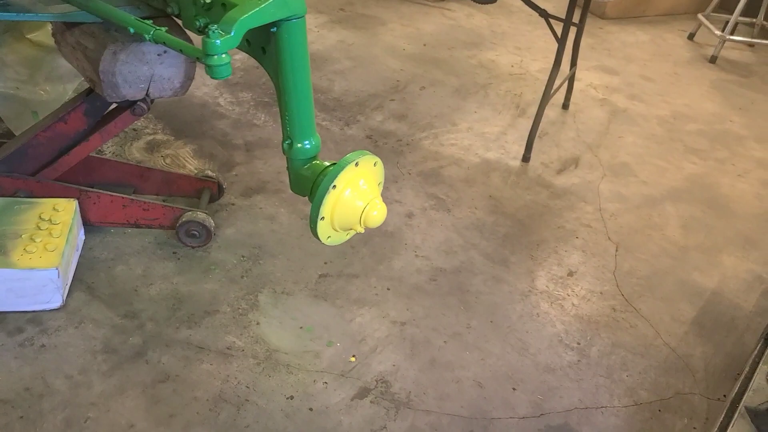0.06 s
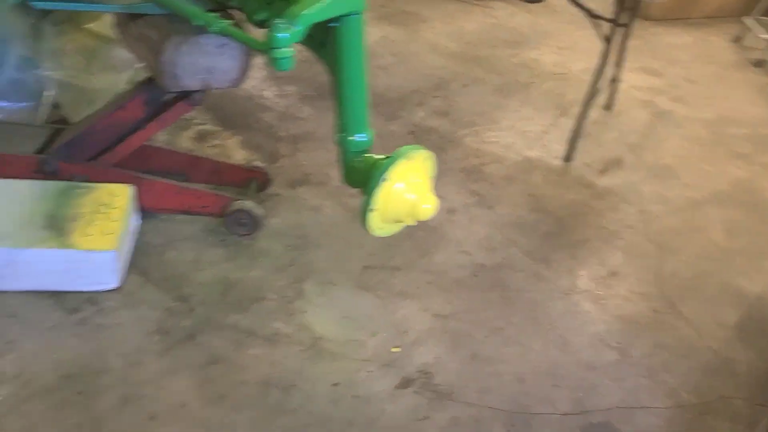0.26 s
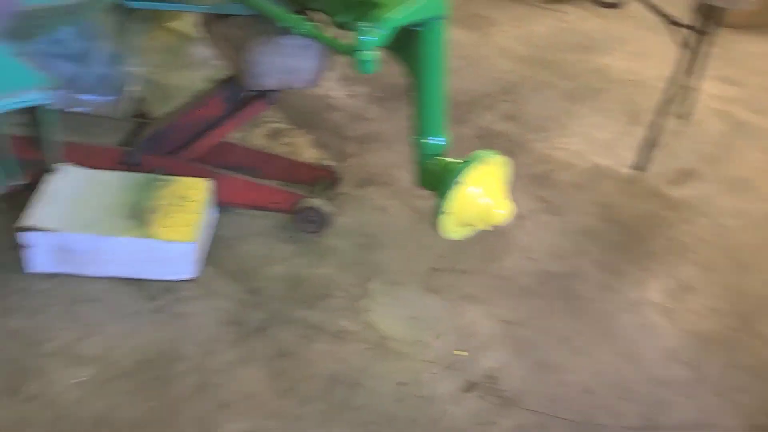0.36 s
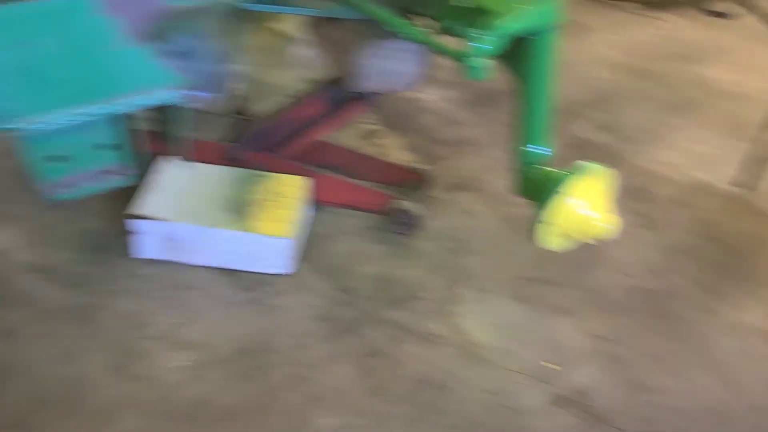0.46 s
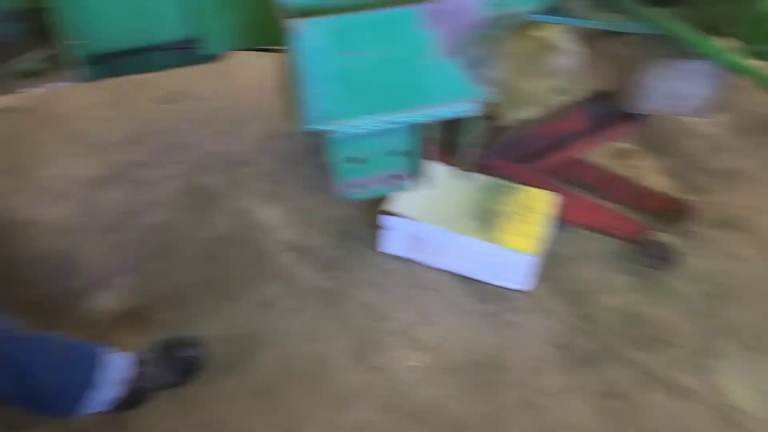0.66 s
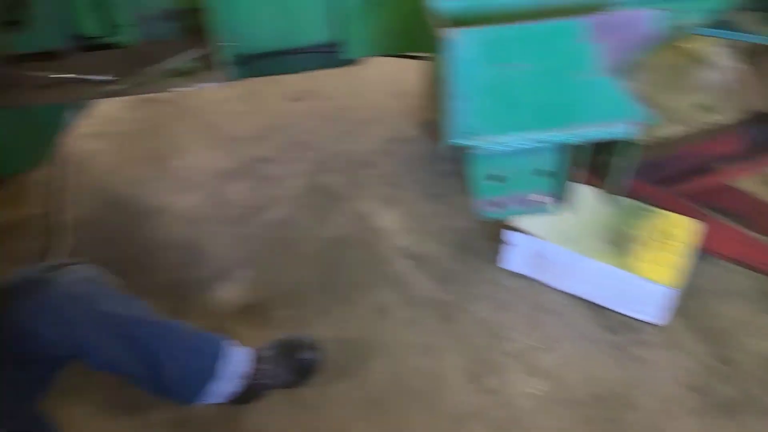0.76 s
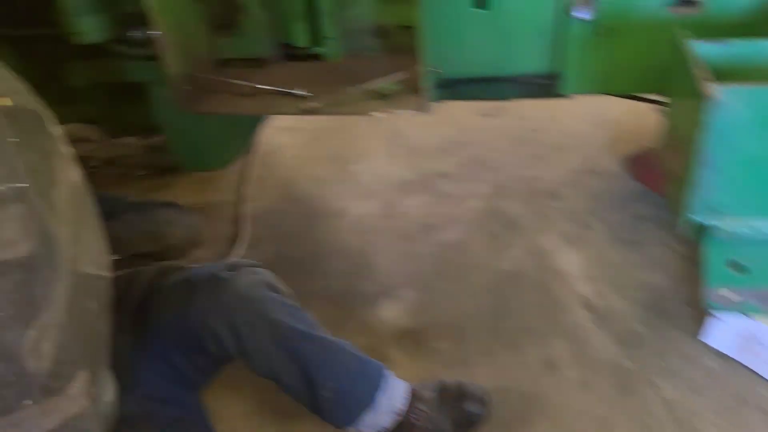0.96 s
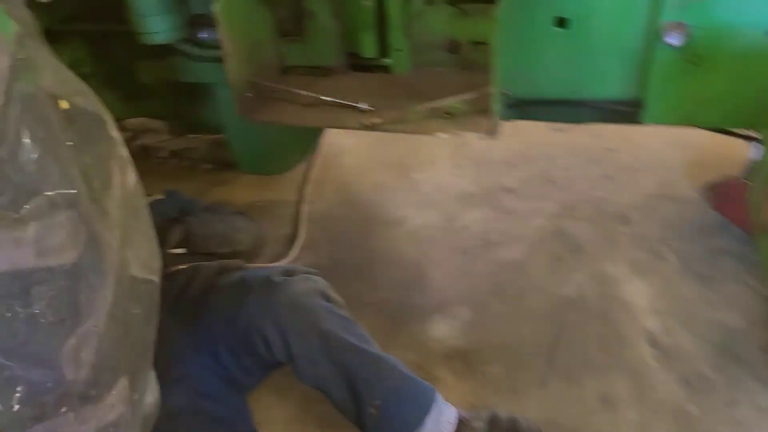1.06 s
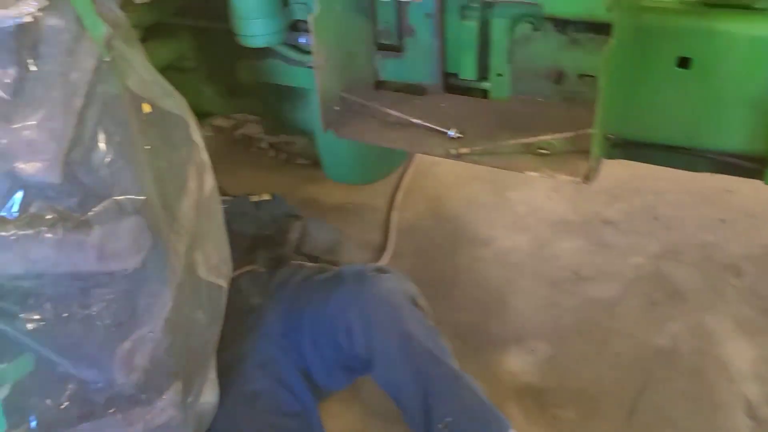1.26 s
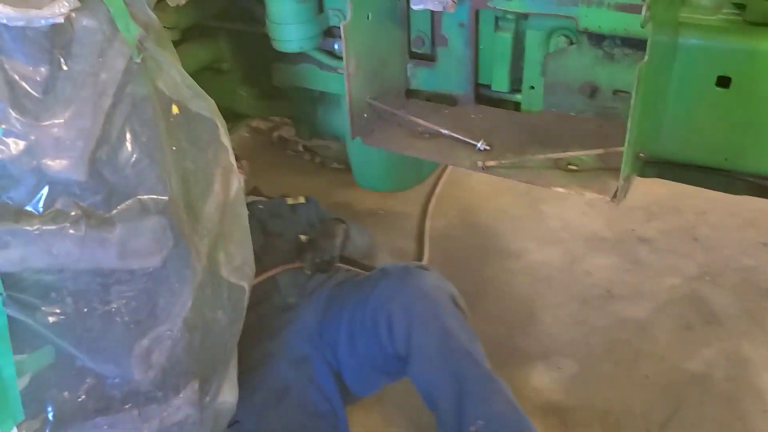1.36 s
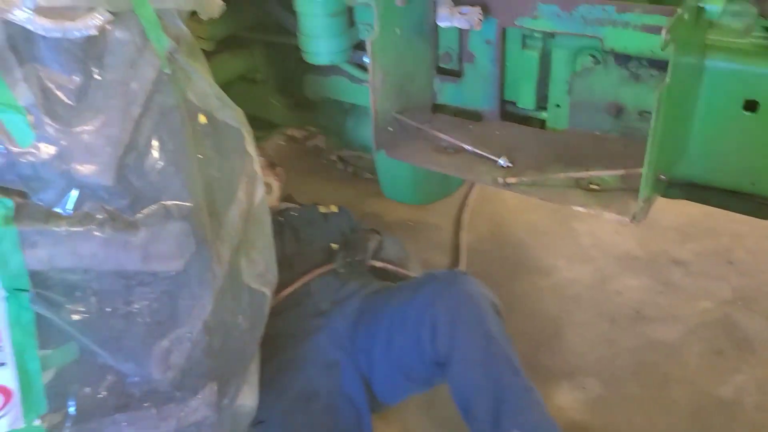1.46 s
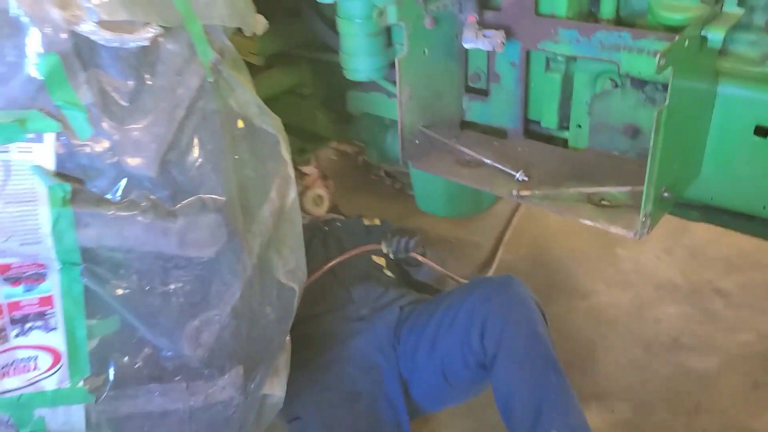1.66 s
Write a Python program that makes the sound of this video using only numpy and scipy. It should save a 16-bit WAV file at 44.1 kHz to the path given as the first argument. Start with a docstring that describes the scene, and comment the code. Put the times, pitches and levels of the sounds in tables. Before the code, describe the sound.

A paint spray gun fires one loud, short burst of compressed air over a steady faint leak hiss; its tail fades in a hard workshop, then a hollow object knocks several times, heard by a close stereo microphone.

```python
"""A spray-gun burst in a farm workshop. Throughout: filtered-noise leak hiss and low shop noise; steel sines fade.
At 0.19 s the trigger opens the air, a surging noise jet; then paint dulls and thickens it.
On release the paint stops first. Steel parts sing faintly in the blast; the room leaves a tail.
Soft thuds, bursts of low noise, start with the puff of the valve and run on past the gun.
Last, a faint drag, then a hollow object knocks: noise clatter rings its modes."""
import sys
import numpy as np
from scipy import signal
from scipy.fft import rfft, irfft
from scipy.io import wavfile
from scipy.ndimage import uniform_filter1d

SR = 44100
rng = np.random.default_rng(int(sys.argv[2]) if len(sys.argv) > 2 else 0)


def inscribe(sig):
    """Save sig as 16-bit PCM at rate SR to the path in sys.argv[1].

    A 1-D sig is mono; a 2-D sig holds one channel per row.
    Samples are clipped to [-1, 1] before scaling.
    """
    pcm = np.round(np.clip(np.atleast_2d(sig).T, -1, 1) * 32767)
    wavfile.write(sys.argv[1], SR, pcm.astype(np.int16))


N = 74970
T = np.arange(N) / SR
CUTOFF_HZ = 15650


def from_db(db):
    """Decibels to gain."""
    return 10 ** (np.asarray(db) / 20)


def rms_one(x):
    """Scale to unit rms."""
    return x / np.sqrt(np.mean(x ** 2) + 1e-20)


def at_hz(points, hz):
    """Read a table on a log-frequency axis."""
    f, value = np.transpose(points)
    return np.interp(np.log(hz + 1e-3), np.log(f), value)


def pan(db):
    """Left and right gains for a left-minus-right level difference."""
    g = from_db(np.array([[.5], [-.5]]) * db)
    return g / np.sqrt(np.mean(g ** 2, axis=0))


# left-right likeness: f/Hz, correlation
LIKENESS = [(40, 0.78), (140, 1), (350, 0.88), (700, 0.89), (1250, -0.63), (2500, 0.095), (15000, 0.021)]


def stereo(mid, side, hz):
    """Mix two independent noises into channels with the correlation tabled at hz."""
    alike = np.clip(at_hz(LIKENESS, hz), -1, 1)
    return np.sqrt(1 + alike) * mid + np.sqrt(1 - alike) * side * [[1], [-1]]


def noise(spectrum, balance=None, tilt_db_per_octave=0):
    """Coloured stereo noise, alike in the bass, falling away outside its table; rms 1."""
    hz = np.arange(1, N // 2 + 2) * SR / N
    mid, side = rfft(rng.standard_normal((2, N)))
    low_edge = 1 / np.hypot(1, (spectrum[0][0] / 2 / hz) ** 2)
    high_edge = 1 / np.hypot(1, (hz / 2 / spectrum[-1][0]) ** 2)
    colour = from_db(at_hz(spectrum, hz) + tilt_db_per_octave * np.log2(hz))
    gain = (hz < CUTOFF_HZ) * low_edge * high_edge * colour
    sides = pan(at_hz(balance, hz) if balance else 0)
    return rms_one(irfft(stereo(mid, side, hz) * gain * sides, N))


def flutter(rate_hz):
    """Random wander: straight lines between normal draws of spread 1."""
    return np.interp(T * rate_hz, np.arange(1000), rng.standard_normal(1000))


def valve(on_s, off_s, attack_s, release_s):
    """Opens, holds and closes."""
    opening = np.clip((T - on_s) / attack_s, 0, 1)
    closing = np.clip(1 - (T - off_s) / release_s, 0, 1)
    return opening * closing


def blow(start_s, rise_s, decay_s):
    """Linear rise, then exponential decay with time constant decay_s."""
    return np.clip((T - start_s) / rise_s, 0, 1) * np.exp(-np.maximum(T - start_s - rise_s, 0) / decay_s)


MIC_SPREAD_S = 0.00077  # longest delay between the two microphones


def ring(hz, t60_s):
    """A dying sine, its phase shifted by a slightly different arrival at each microphone."""
    arrival_s = T + MIC_SPREAD_S * rng.random((2, 1))
    return from_db(-60 * T / t60_s) * np.sin(2 * np.pi * (hz * arrival_s + rng.random()))


def ringing(x, modes, db):
    """What a sound leaves ringing in a set of modes, at a level relative to that sound."""
    response = sum(from_db(mode_db) / np.sqrt(t60_s) * ring(hz, t60_s) for hz, mode_db, t60_s in modes)
    rung = signal.fftconvolve(x, response, axes=1)[:, :N]
    return from_db(db) * np.std(x) * rms_one(rung)


# leaking air: f/Hz, density/dB per Hz
LEAK_SPECTRUM = [(880, -27), (1500, -10.5), (1700, -16), (2110, -12), (2240, -19), (2540, -9.5),
                 (2700, -13.5), (3180, -9), (3280, -11.5), (3800, -10.5), (4440, -7.5), (5780, -0.5),
                 (8460, -5.5), (11900, -1), (15500, -3.5)]
# leaking air: f/Hz, left minus right/dB
LEAK_BALANCE = [(2000, -14.5), (4000, -3), (6300, -4), (7600, 1), (8700, -2), (10000, -2.5), (11700, -8),
                (13300, -0.5), (15000, -2.5)]
# low noise of the shop: f/Hz, density/dB per Hz
SHOP_SPECTRUM = [(22, -6), (50, -0.5), (90, -1), (180, -16.5), (380, -13.5), (550, -13.5), (750, -7.5),
                 (1200, -11.5), (2000, -19.5), (4000, -13)]
# ring of steel: f/Hz, level/dB
STEEL_MODES = [(947, -54), (968, -49.5), (994, -52), (1016, -53.5), (1036, -50.5), (1114, -48), (1400, -62),
               (1755, -56)]
LEAK_DB, SHOP_DB, STEEL_T60_S = -36, -50, 0.68


def background():
    """Steady noise of leaking air and shop; steel as sines dying from the start."""
    leak = from_db(LEAK_DB) * noise(LEAK_SPECTRUM, LEAK_BALANCE)
    shop = from_db(SHOP_DB) * noise(SHOP_SPECTRUM)
    steel = sum(from_db(db) * ring(hz, STEEL_T60_S) for hz, db in STEEL_MODES)
    return leak + shop + steel


# jet of air alone: f/Hz, density/dB per Hz
AIR_SPECTRUM = [(300, -51), (700, -17), (1100, -23), (1600, -5), (2100, -7), (2900, -1.5), (3800, -1.5),
                (5000, -1), (5900, 2), (7000, -0.5), (8000, -1.5), (10100, -4.5), (11500, 2), (12300, -2),
                (12900, 4), (13500, 2.5), (14500, 4), (15300, 0)]
# jet of air with paint: f/Hz, density/dB per Hz
PAINT_SPECTRUM = [(300, -9), (600, -11.5), (950, -10), (1250, -2.5), (2000, 0.5), (3050, 2.5), (3450, -2),
                  (3800, 0.5), (4400, -3.5), (5500, -0.5), (6600, 2), (8000, -4.5), (10000, -7),
                  (11400, 0.5), (13000, -0.5), (14200, 0), (15100, 1)]
# buffeting of the blast: f/Hz, density/dB per Hz
RUMBLE_SPECTRUM = [(22, -11), (45, -1), (70, 6), (95, 0), (128, 10), (165, -3), (230, -2), (340, 0),
                   (480, -12), (900, -7)]
# both jets: f/Hz, left minus right/dB
JET_BALANCE = [(100, -8), (300, 2), (600, -3.5), (1200, -5), (1700, -8), (3400, -3.5), (5000, -4.5),
               (6300, -5), (7400, 0), (8800, -6.5), (10000, -1), (11700, -6), (13000, 0), (15000, 0)]
AIR_DB, PAINT_DB, RUMBLE_DB = -18, -22, -39.5
AIR_ON_S, AIR_OFF_S, AIR_ATTACK_S, AIR_RELEASE_S = 0.191, 0.55, 0.011, 0.06
PAINT_ON_S, PAINT_OFF_S, PAINT_ATTACK_S, PAINT_RELEASE_S = 0.229, 0.489, 0.048, 0.085
RUMBLE_OFF_S, RUMBLE_RELEASE_S = 0.54, 0.12
# pressure stored in the hose, spent at the start
SURGE_DB, SURGE_RISE_S, SURGE_DECAY_S = 6.5, 0.018, 0.0098
FLUTTER_DB, FLUTTER_HZ = 0.8, 127


def spray_gun():
    """Turbulent jet: bright on air alone, fuller while it atomises paint, with low buffeting."""
    air = valve(AIR_ON_S, AIR_OFF_S, AIR_ATTACK_S, AIR_RELEASE_S) ** 2
    paint = valve(PAINT_ON_S, PAINT_OFF_S, PAINT_ATTACK_S, PAINT_RELEASE_S)
    surge_db = SURGE_DB * blow(AIR_ON_S, SURGE_RISE_S, SURGE_DECAY_S)
    pressure = from_db(surge_db + FLUTTER_DB * flutter(FLUTTER_HZ))
    # equal-power crossfade
    air_jet = np.sqrt(1 - paint) * from_db(AIR_DB) * noise(AIR_SPECTRUM, JET_BALANCE)
    paint_jet = np.sqrt(paint) * from_db(PAINT_DB) * noise(PAINT_SPECTRUM, JET_BALANCE)
    buffeting = valve(AIR_ON_S, RUMBLE_OFF_S, AIR_ATTACK_S, RUMBLE_RELEASE_S)
    rumble = from_db(RUMBLE_DB) * buffeting * noise(RUMBLE_SPECTRUM)
    return air * pressure * (air_jet + paint_jet) + rumble


# steel parts in the blast: f/Hz, level/dB, t60/s
SINGING_MODES = [(1240, 7, 0.27), (1520, 6, 1), (1617, 0, 0.88), (2530, -18, 0.31), (3085, -8, 0.19),
                 (3860, 12.5, 0.12), (4397, 21.5, 0.14), (5980, -17, 0.14), (6570, -14, .16)]
SINGING_DB = -15  # re gun


def singing_steel(gun):
    """Steel parts resonate faintly, driven by the blast."""
    return ringing(gun, SINGING_MODES, SINGING_DB)


# workshop reverberation: f/Hz, t60/s
ROOM_T60 = [(100, 0.15), (500, 1), (1500, 0.97), (3000, 0.98), (6000, 0.67), (10000, 0.35), (15000, 0.21)]
ROOM_GAP_S = 0.0056


def room(x):
    """Diffuse tail: noise bands after a short gap, each dying at its own rate."""
    edges_hz = np.geomspace(60, 17000, 13)
    white = rng.standard_normal((2, 2, N))
    tail = 0
    for k, (low, high) in enumerate(zip(edges_hz, edges_hz[1:])):
        hz = np.sqrt(low * high)
        band = signal.butter(2, [low, high], "band", fs=SR, output="sos")
        mid, side = signal.sosfilt(band, white[k % 2])
        fade = (T > ROOM_GAP_S) * from_db(-60 * T / at_hz(ROOM_T60, hz))
        tail = tail + stereo(mid, side, hz) * fade / np.sqrt(2 * np.sum(fade ** 2))
    return signal.fftconvolve(x, tail, axes=1)[:, :N]


# mostly handling, the first the puff of the opening valve:
# t/s, level/dB, decay time constant/s, lower edge f/Hz, top edge f/Hz
THUDS = [(0.196, -38, 0.031, 35, 90), (0.778, -47.5, 0.013, 100, 300), (0.942, -41.5, 0.0087, 80, 450),
         (1.219, -46, .02, 100, 149), (1.314, -39, 0.021, 70, 138), (1.315, -30.5, 0.015, 277, 335),
         (1.484, -42, 0.026, 39.8, 161), (1.554, -39, 0.016, 57, 121.5)]
THUD_RISE_S = 0.003


def thuds():
    """Soft, dull bumps: short bursts of band-limited noise."""
    total = 0
    for start_s, db, decay_s, low_hz, high_hz in THUDS:
        band = [(low_hz / 2, -22), (low_hz, 0), (high_hz, 0), (2 * high_hz, -22)]
        total = total + from_db(db) * blow(start_s, THUD_RISE_S, decay_s) * noise(band)
    return total


# drag: f/Hz, density/dB per Hz
DRAG_SPECTRUM = [(150, -21), (400, -9), (600, -11), (800, 0.5), (1100, -37), (2000, -36.5)]
# knocks: t/s, level/dB, rise/s, decay time constant/s, brightness/dB per octave
KNOCKS = [(1.217, -31.5, .001, 0.022, -2), (1.235, -24.5, .018, .014, -1), (1.315, -23.5, 0.00091, .028, 1),
          (1.405, -42.5, 0.018, 0.03, -3), (1.484, -35.5, 0.0058, 0.024, 2.5),
          (1.696, -31.5, 0.0025, 0.014, -1.5)]
# broad colour of the hollow object: f/Hz, density/dB per Hz
BODY_SPECTRUM = [(60, -28), (115, -12.5), (200, -22), (300, -8.5), (460, -3), (700, -2), (900, 2),
                 (1400, 1), (1580, -10.5), (2000, -9), (2200, -4.5), (2480, -8.5), (2800, -18),
                 (3600, -16.5), (6000, -20.5), (12000, -28)]
# its ringing modes: f/Hz, level/dB, t60/s
BODY_MODES = [(299, 2.5, .1), (688, -3.5, 0.18), (796, 4.5, 0.11), (915, -5, 0.2), (972, 0.5, 0.033),
              (1173, 2.5, 0.084), (1262, -3, 0.37), (1342, -4, 0.19), (1406, 3.5, 0.15), (2277, -1, 0.077),
              (2450, 5, 0.062)]
DRAG_ON_S, DRAG_OFF_S, DRAG_FADE_S, DRAG_DB = 0.71, 1.11, 0.43, -54
CRACK_DB, CRACK_DECAY_S = -4, 0.004
RING_DB, KNOCK_PAN_DB = -3, -3  # re clatter; left minus right


def knocks():
    """After a faint drag, each knock's crack and dense, quickly dying clatter ring the object's modes."""
    clatter = 0
    for start_s, db, rise_s, decay_s, tilt in KNOCKS:
        # slow rises soften the crack
        crack = from_db(CRACK_DB) * blow(start_s, rise_s, CRACK_DECAY_S) * np.minimum(CRACK_DECAY_S / rise_s, 1)
        force = blow(start_s, rise_s, decay_s) + crack
        clatter = clatter + from_db(db) * force * noise(BODY_SPECTRUM, tilt_db_per_octave=tilt)
    dragging = valve(DRAG_ON_S, DRAG_OFF_S, DRAG_FADE_S, DRAG_FADE_S)
    drag = from_db(DRAG_DB) * dragging * noise(DRAG_SPECTRUM)
    return (clatter + ringing(clatter, BODY_MODES, RING_DB) + drag) * pan(KNOCK_PAN_DB)


JET_ROOM_DB, KNOCK_ROOM_DB, ROOM_LOW_HZ = 1.5, -1.5, 247


def scene():
    """Gun, thuds and knocks in the room, over the background; the bass stays dry."""
    gun = spray_gun()
    handling = thuds() + knocks()
    send = from_db(JET_ROOM_DB) * gun + from_db(KNOCK_ROOM_DB) * handling
    send = signal.sosfilt(signal.butter(2, ROOM_LOW_HZ, "high", fs=SR, output="sos"), send)
    return background() + gun + singing_steel(gun) + handling + room(send)


# AGC_SHARE: part of the excess level removed
AGC_THRESHOLD_DB, AGC_SHARE, AGC_ATTACK_S, AGC_RELEASE_DB_PER_S = -22, 0.21, 0.045, 2


def record(dry):
    """Gain control ducks a little under the blast and recovers slowly; the top is cut steeply."""
    power = uniform_filter1d(np.mean(dry ** 2, axis=0), size=512)
    level_db = 10 * np.log10(power + 1e-12)
    cut_db = AGC_SHARE * np.maximum(level_db - AGC_THRESHOLD_DB, 0)
    # peak hold with linear release in dB
    release_db = AGC_RELEASE_DB_PER_S * T
    held_db = np.maximum.accumulate(cut_db + release_db) - release_db
    r = np.exp(-1 / (AGC_ATTACK_S * SR))
    ducked = dry * from_db(-signal.lfilter([1 - r], [1, -r], held_db))
    return signal.sosfilt(signal.ellip(12, .1, 80, CUTOFF_HZ, fs=SR, output="sos"), ducked)


dry = scene()
out = record(dry)
inscribe(out)
```